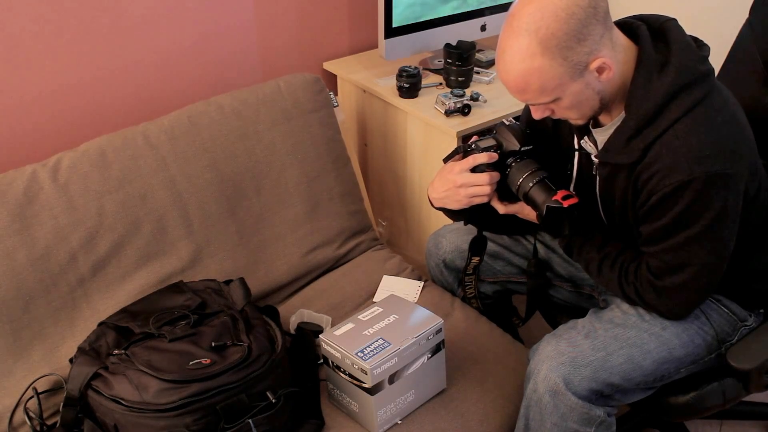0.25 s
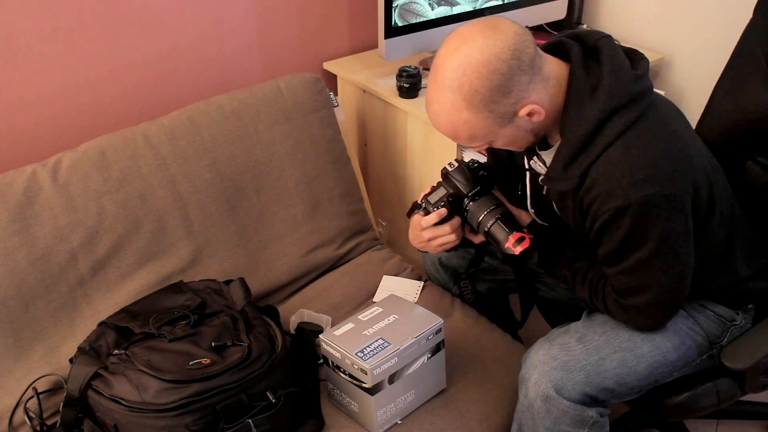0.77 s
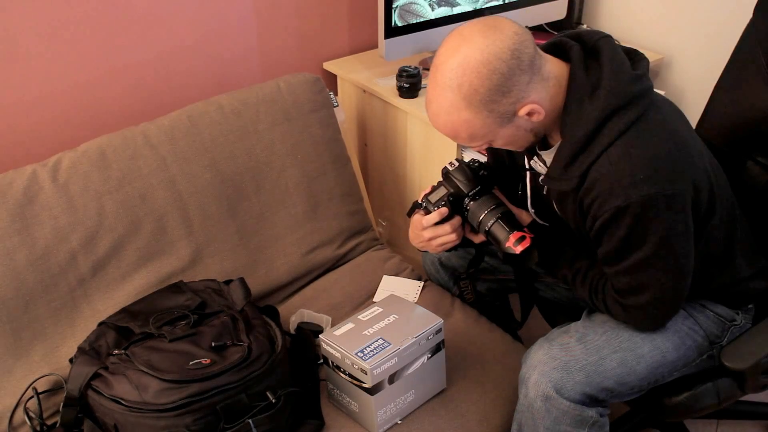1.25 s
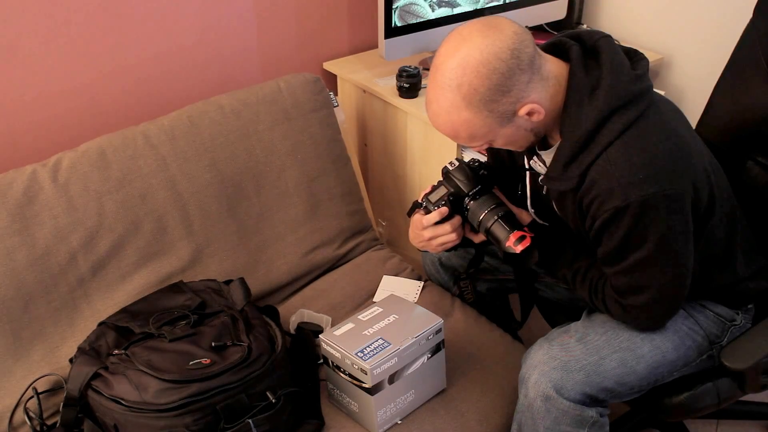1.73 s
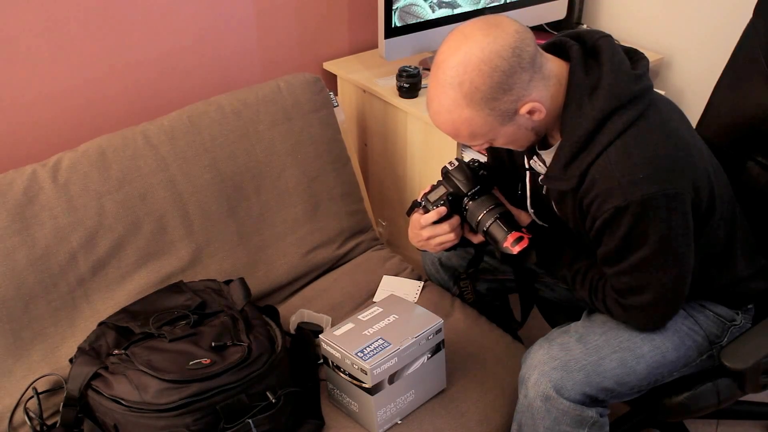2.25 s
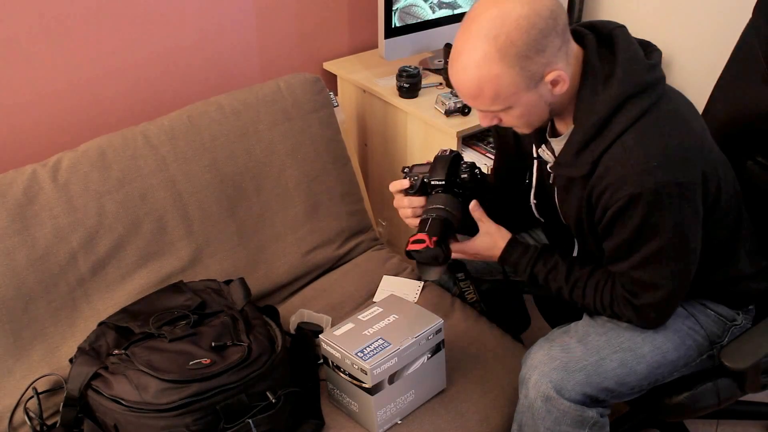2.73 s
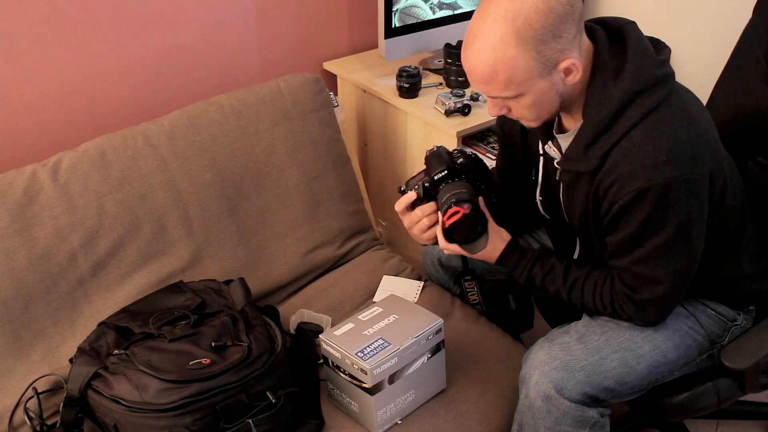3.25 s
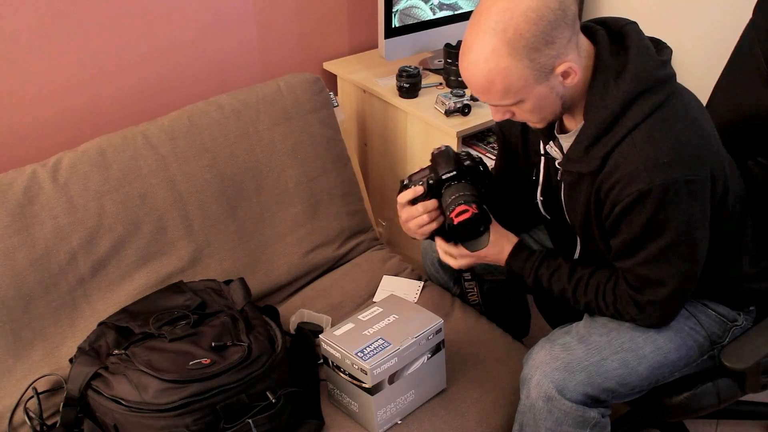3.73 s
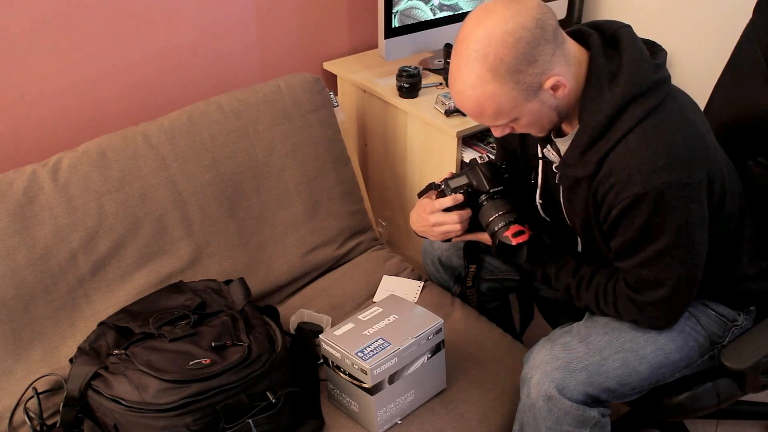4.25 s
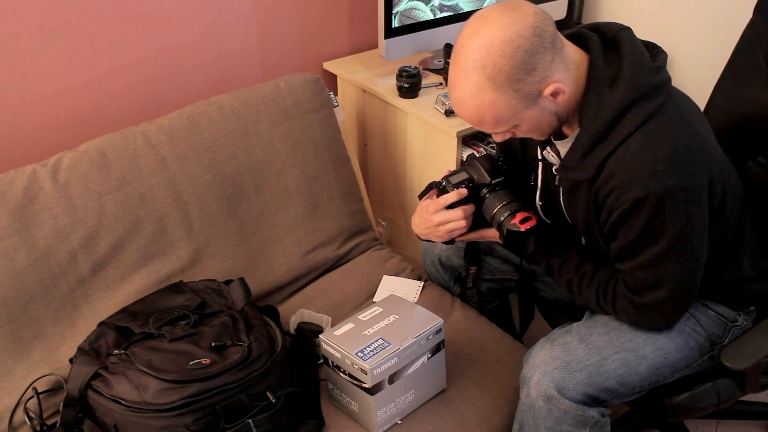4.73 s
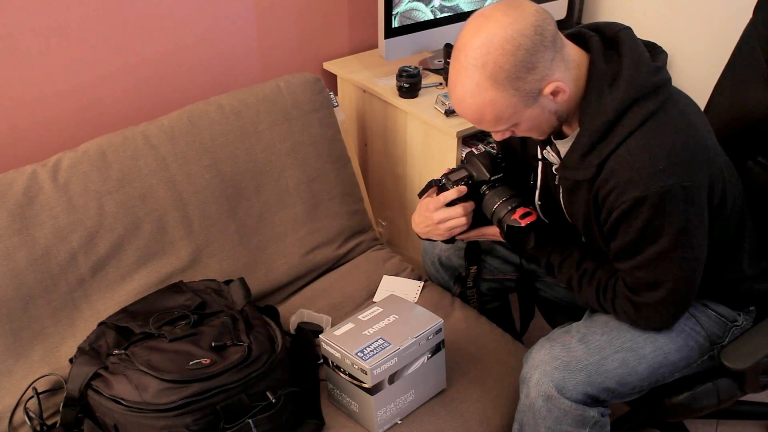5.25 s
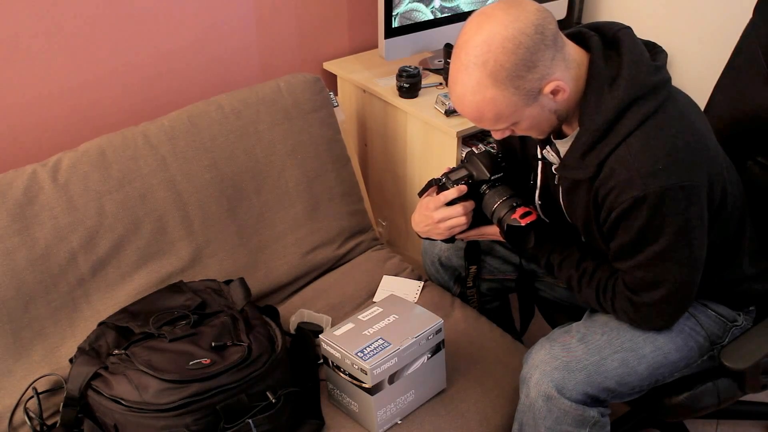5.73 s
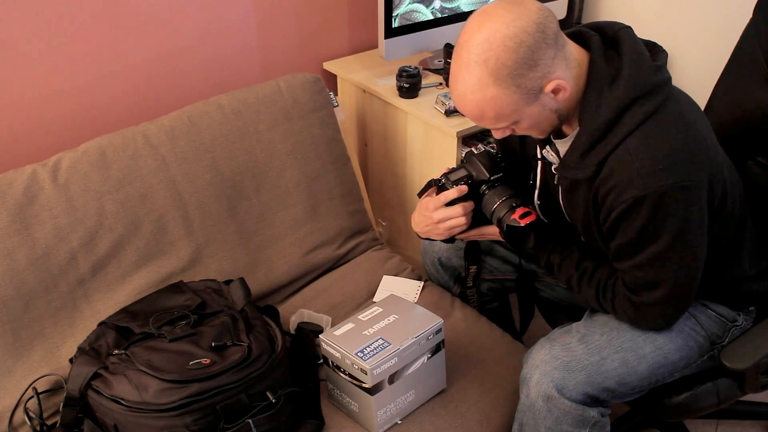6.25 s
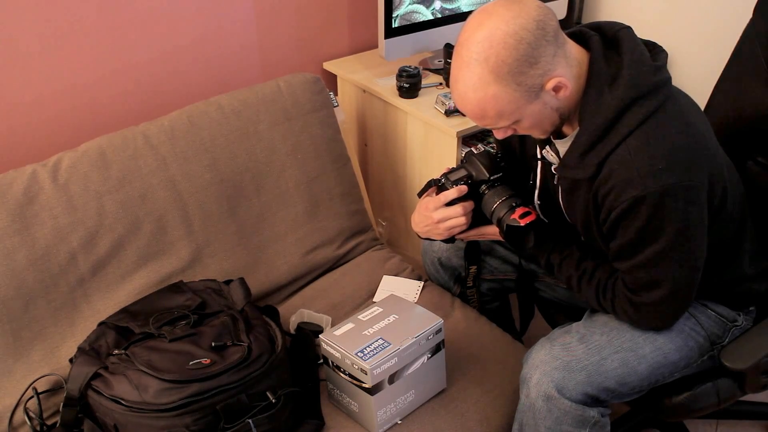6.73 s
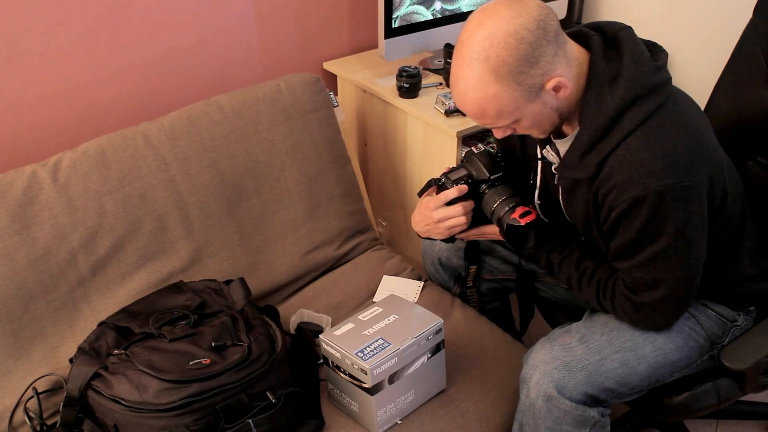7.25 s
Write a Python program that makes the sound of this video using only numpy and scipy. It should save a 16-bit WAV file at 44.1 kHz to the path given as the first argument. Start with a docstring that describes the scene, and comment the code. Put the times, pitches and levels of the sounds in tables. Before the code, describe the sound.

A camera lens autofocus motor whirs, grinds and clacks in short bursts, with fingers tapping and clicking between, in a quiet room.

```python
"""A camera's autofocus hunts in five short bursts, close to a mono microphone in a quiet room.
Plastic gears grind and whine, the lens knocks on its end stop, the motor creeps and latches with a click.
Between bursts, hands slide over the barrel, tap it, press its buttons and snap a sprung switch.
Underneath, a slow machine hums and a low tone swells twice over faint rumble and hiss."""
import sys
import numpy as np
from scipy import signal
from scipy.fft import rfft, irfft
from scipy.io import wavfile
from scipy.ndimage import uniform_filter1d

SR = 44100
rng = np.random.default_rng(int(sys.argv[2]) if len(sys.argv) > 2 else 0)


def wav_out(sig):
    """Save sig, one row per channel (or a flat mono array), as 16-bit PCM at SR to the path in sys.argv[1]."""
    wavfile.write(sys.argv[1], SR, np.round(np.clip(np.atleast_2d(sig).T, -1, 1) * 32767).astype(np.int16))


N = 329868
BINS = np.fft.rfftfreq(2048, 1 / SR)  # frequency grid of every EQ curve [Hz]


# barrel tone with the gears running free, and under load: (frequency [Hz], gain [dB])
FREE_EQ = [(100, -26), (250, 0), (460, 10), (750, 0), (1120, -4), (1350, -8), (2100, -2.5), (2800, -7.5),
           (3650, 1.5), (5000, -10), (5550, -4), (6600, -18.5), (8350, -14), (9400, -21), (15000, -26)]
LOADED_EQ = [(100, -10.5), (250, -4.5), (600, 2), (900, -5.5), (1150, -4.5), (1800, -10.5), (2600, -5),
             (3100, -2), (3600, 1), (4300, -7.5), (5200, -5.5), (7200, -14), (9600, -19.5), (15000, -31.5)]
# small metal parts that ring along under load: (pitch [Hz], level [dB], t60 [s])
SPRING_MODES = [(590, -7, .03), (1535, -6, .18), (3080, 3, .075), (3440, -7, .05), (5170, 3, .09),
                (6145, -2, .14)]
# focus bursts: (start [s], end [s], attack [s], level [dB], swell [dB/s], treble [dB],
# shaft speed [turns/s], wobble [0-1], load [0 free, about 1 grinding])
FOCUS_RUNS = [(0.0, 0.072, 0.00072, -44.5, 36, -10.5, 79.9, 0.83, 0.137),
              (1.292, 1.563, 0.031, -46, 25, -12.5, 79.2, 0.59, 0.14),
              (1.745, 2.016, 0.0032, -44.5, -7, -10.5, 79.37, 0.9, 0.17),
              (5.154, 5.357, 0.034, -40.0, 52, -11, 74.33, 0.52, 1.04),
              (7.163, 7.371, 0.045, -38, -28, -9.5, 44.3, 0.62, 1.02)]

def gears(start, end, attack_s, level_db, swell_db_per_s, treble_db, shaft_hz, wobble, load,
          teeth=15, uneven_db=6.5, rub=1.68, coast_s=.011):
    """Uneven teeth strike and rub, harder twice a turn, and sound through the barrel."""
    t = np.arange(start, end + coast_s, 1 / SR)
    turns = np.cumsum(shaft_hz * (1 + .02 * drift(t, 60))) / SR
    strikes = np.diff(np.floor(turns * teeth + .2 * drift(t, 900)), prepend=0) > 0
    strikes = strikes * amp(uneven_db * np.clip(rng.standard_normal(len(t)), -2, 2))
    strikes = signal.fftconvolve(strikes - strikes.mean(), rattle(.00064, blow=1.9))[:len(t)]
    pressure = np.exp(wobble * (.28 * np.cos(2 * np.pi * turns) + .33 * np.cos(4 * np.pi * turns)))
    force = (unit(strikes) + rub * rng.standard_normal(len(t))) * pressure * amp(drift(t, 90))
    springs = load * amp(-46) * signal.fftconvolve(force, ring(SPRING_MODES))[:len(t)]
    barrel = (1 - load) * curve(FREE_EQ) + load * curve(LOADED_EQ) + curve([(1100, .5), (2000, 0)])
    grind = unit(colour(force + springs, barrel))
    treble = signal.fftconvolve(grind, signal.firwin(63, 6000, pass_zero=False, fs=SR), "same")
    effort_db = swell_db_per_s * (t - t.mean())
    body = amp(effort_db - 1.5) * (grind - treble)
    # the top end swells less than the body but pulses harder with the shaft
    sizzle = amp(treble_db + .63 * effort_db) * unit(treble * pressure ** .61)
    return start, amp(level_db) * (body + sizzle) * envelope(t, attack_s, .0054) ** 2


# tones of the fast gears at full speed: (pitch [Hz], level [dB])
MESH_TONES = [(3724, 0), (3328, -8), (3850, -14)]
# how well the whine gets out of the lens: (frequency [Hz], gain [dB])
HOUSING_EQ = [(3000, -16), (3300, 4), (3900, 1.5)]
# free-running gears sing: (start [s], end [s], fast gears [dB], their swell [dB/s], slow gear [dB])
GEAR_WHINES = [(1.319, 1.557, -50, 5, -56), (1.756, 2.007, -55.5, -33, -56.5)]

def whine(start, end, fast_db, swell_db_per_s, slow_db, slow_hz=1110, sag=.125, sag_s=.021, flutter_db=2):
    """Gear tones dip as the motor takes up the lens, then glide back up to full speed."""
    t = np.arange(0, end - start, 1 / SR)
    speed = 1 - sag * (t / sag_s * np.exp(1 - t / sag_s)) ** 2
    angle = 2 * np.pi * np.cumsum(speed * (1 + .0021 * drift(t, 120))) / SR
    fast = sum(amp(db + curve(HOUSING_EQ, hz * speed) + flutter_db * drift(t, 160)) * np.sin(hz * angle)
               for hz, db in MESH_TONES)
    build_up = 1 - np.exp(-t / .06)
    slow = amp(flutter_db * drift(t, 140)) * build_up * np.sin(slow_hz * angle)
    tones = amp(fast_db + swell_db_per_s * t) * speed ** 2 * fast + amp(slow_db) * slow
    return start, np.sqrt(2) * tones * envelope(t, .008, .004)


# end-stop clacks: (time [s], level [dB], thud [dB], snap [dB], chatter [s], resonance [Hz])
END_STOPS = [(0.081, -16, -15.5, -12, 0.0033, 780), (1.567, -11.5, -24.5, -19.5, 0.0022, 3800),
             (2.019, -13, -16, -8, 0.003, 450), (5.364, -12.5, -22.5, -17.5, 0.0023, 3200)]

def end_stop(s, db, thud_db, snap_db, chatter_s, hz):
    """The lens group clacks against its hollow housing."""
    tilt = curve([(600, thud_db + 23), (1400, 0), (4500, 0), (7500, snap_db + 15)])
    force = rattle(chatter_s, blow=5.1, rise_s=.00095)
    return knock(s, db, tilt + bell(hz, db=6, octaves=.3), force, crest_db=25)


# tone of the creeping motor: (frequency [Hz], gain [dB])
CREEP_EQ = [(200, -19), (400, -4.5), (540, -9), (800, -15), (1300, -10), (2200, -22.5), (4400, -19.5),
            (5700, -21.5), (7100, -22), (8200, -30.5), (15000, -44)]
# the motor inches along: (start [s], end [s], level [dB])
MOTOR_CREEPS = [(0.091, .144, -55.5), (1.578, 1.627, -56.5), (2.031, 2.083, -55), (5.375, 5.422, -55),
                (6.963, 7.035, -55)]

def creep(start, end, db, tooth_hz=543, uneven_db=3, rub=1.3):
    """A soft rough buzz of teeth at low speed, growing as they take up the slack."""
    t = np.arange(start, end, 1 / SR)
    angle = 2 * np.pi * np.cumsum(tooth_hz * (1 + .006 * drift(t, 148.5))) / SR
    overtones = sum(amp(uneven_db * rng.standard_normal()) * np.cos(k * angle + 2 * np.pi * rng.random())
                    for k in range(2, 14))
    force = unit(np.cos(angle) + .397 * overtones) + rub * rng.standard_normal(len(t))
    level = amp(db + np.linspace(-3, 1.5, len(t))) * envelope(t, .0028, .0028)
    return start, level * unit(colour(force, curve(CREEP_EQ)))


# the gears take up their slack: (time [s], level [dB], snap [dB], chatter [s])
SLACK_KICKS = [(1.292, -43.5, -18.5, 0.0054), (1.325, -33.5, -16, 0.0042), (1.742, -31, 12, 0.0019),
               (5.149, -39.5, -15, 0.012), (6.935, -31, -21, 0.0068), (6.947, -33, -14, 0.0047),
               (7.147, -44, -13, .005), (7.165, -27.5, 5, 0.007), (7.172, -22, -14, 0.0037)]
# the drive latches after a creep: (time [s], level [dB])
DRIVE_LATCHES = [(1.648, -27), (5.438, -30), (7.049, -33)]

def drive_clicks(halt_db=-41.5):
    """The drive kicks as its gears engage, ticks as each creep halts, and latches."""
    kicks = [click(s, db, -9.5, snap_db, chatter_s, hz=3330) for s, db, snap_db, chatter_s in SLACK_KICKS]
    halts = [(end, halt_db) for _, end, _ in MOTOR_CREEPS]
    return kicks + [click(s, db, thud_db=-17, snap_db=-19, chatter_s=.0017, hz=3370, resonance_db=0)
                    for s, db in [*halts, *DRIVE_LATCHES]]


# ring of the switch spring: (pitch [Hz], level [dB], t60 [s])
SWITCH_RING = [(484, -26, 0.18), (1555, 3, 0.18), (3030, -7.5, .15), (3900, -4, .15)]

def switch(s, snap_level_db=-14, ring_db=-48.5, buzz_db=-42.5, buzz_t60=.18):
    """A sprung switch snaps over; its spring sings and loose plastic buzzes out."""
    snap = click(s, snap_level_db, thud_db=-15, snap_db=-18.5, chatter_s=.003, hz=1510, resonance_db=7)
    spring = ring(SWITCH_RING)
    t = np.arange(len(spring)) / SR
    plastic = curve(SHELL_EQ) + curve([(2000, -4), (8000, -13.5)])
    buzz = unit(colour(rng.standard_normal(len(t)), plastic))
    return [snap, (s, amp(ring_db) * spring + amp(buzz_db - 60 * t / buzz_t60) * buzz)]


# button presses: (time [s], click level [dB], bottoming-out level [dB])
BUTTON_PRESSES = [(0.247, -32, -41), (2.195, -31.5, -39.5), (3.871, -40, -56)]

def button(s, db, bottom_db, lead_s=.016, travel_s=.0135):
    """The finger lands softly, the button snaps through and bottoms out."""
    return [click(s - lead_s, db - 16.5, thud_db=-25, snap_db=2, chatter_s=.0074, hz=4530),
            click(s, db, thud_db=-14, snap_db=-3, chatter_s=.0024, hz=10000),
            tap(s + travel_s, bottom_db, thud_db=-14.5, chatter_s=.0079)]


# fingers on the body: (time [s], level [dB], thud [dB], chatter [s], resonance [Hz])
FINGER_TAPS = [(2.417, -44.5, 0, .002, 950), (2.549, -44, -13.5, .002, 870), (2.907, -40, -8, 0.0023, 1100),
               (2.922, -41, -5, .002, 804), (2.975, -30.5, -15.5, 0.0057, 1520),
               (2.993, -37, -13, 0.0077, 1240), (3.102, -37.5, -8.5, 0.0036, 1040),
               (3.645, -25.5, -20, 0.0037, 1920), (3.667, -34, -11.5, 0.0031, 950),
               (3.855, -35.5, -8, 0.006, 1340), (3.955, -41, -8, 0.003, 840),
               (4.002, -40.5, -7, .0016, 1000), (4.034, -27.5, -7.5, 0.0036, 1060)]

def tap(s, db, thud_db=-9, chatter_s=.003, hz=950):
    """A fingertip knocks dully on the body."""
    return click(s, db, thud_db, snap_db=-16, chatter_s=chatter_s, hz=hz, resonance_db=9.5)


def fidget(start, end, db, spread_db=2, count=6):
    """Faint taps at random moments while the grip shifts."""
    return [tap(start + when * (end - start), db + spread_db * (2 * size - 1))
            for when, size in rng.random((count, 2))]


# small plastic ticks: (time [s], level [dB])
GRIP_TICKS = [(2.616, -41), (2.868, -50), (4.135, -49), (4.148, -40.5), (6.094, -47.5), (6.24, -54)]

def grip_tick(s, db):
    """The plastic shell ticks under the grip."""
    return click(s, db, thud_db=-16, snap_db=-10.5, chatter_s=.00345, hz=3640)


# bright skin friction and soft sleeve rustle: (frequency [Hz], gain [dB])
SKIN_EQ = [(880, -24), (1500, -8), (2170, -4.5), (3030, -5.5), (3480, -1.5), (5400, -8.5), (7670, -7.5),
           (14500, -20), (15500, -24)]
CLOTH_EQ = [(200, -13), (500, 8), (1000, 6.5), (1800, 3), (3000, -19), (8000, -23)]
# hand moves: (start [s], end [s], skin level [dB], cloth level [dB])
HAND_SLIDES = [(2.149, 2.713, -75, -72), (2.702, 3.01, -78, -72), (2.95, 3.542, -66, -69.5),
               (3.6, 4.296, -78, -78)]

def hand_slide(start, end, skin_db, cloth_db, unsteady_db=1.2):
    """Skin slides on the barrel and sleeves rustle, under an unsteady pressure."""
    t = np.arange(start, end, 1 / SR)
    skin = amp(skin_db) * friction(t, SKIN_EQ)
    cloth = amp(cloth_db) * friction(t, CLOTH_EQ)
    pressure = amp(unsteady_db * drift(t, 13.4))
    return start, (skin + cloth) * pressure * envelope(t, .079, .12)


def swish(middle_s, length_s, db, hz):
    """A dry fingertip brushes the barrel: a short airy band of noise."""
    t = np.arange(0, length_s, 1 / SR)
    band = [(hz / 4, -20), (hz / 2, -9), (hz, 0), (2 * hz, -12)]
    brush = friction(t, band, grain_db=3, grains_per_s=300)
    return middle_s - length_s / 2, amp(db) * brush * np.hanning(len(t))


# partials of the machine hum: (multiple of the turn rate [ratio], level [dB])
HUM_PARTIALS = [(1, -61.5), (2, -74.5), (2.46, -70), (3, -70.5), (4, -63.5), (5, -76), (6, -76.5),
                (7, -72.5), (8, -70), (9, -81), (10, -73.5), (11, -80.5), (12, -72.5), (14, -78), (17, -80),
                (18, -91)]

def machine_hum(turn_hz=20.2, smear_cycles=.21, lag_cycles=2.3):
    """The partials of a slow machine throb once a turn, the low ones lagging behind the high."""
    t = np.arange(N) / SR
    hum = np.zeros(N)
    for k, db in HUM_PARTIALS:
        level = amp(db + drift(t, 4.6))
        phase = 2 * np.pi * (smear_cycles * rng.random() - lag_cycles * np.log(k)) + .15 * drift(t, 3.3)
        hum += level * np.sin(2 * np.pi * k * turn_hz * t + phase)
    return np.sqrt(2) * hum


# swells of the low tone: (start [s], end [s], level [dB])
DRONE_SWELLS = [(2.005, 2.6, -62.5), (2.6, 4.3, -61.5)]

def drone(start, end, db, hz=106, waver_db=2, waver_rad=.71):
    """A low tone swells, wavers and fades."""
    t = np.arange(start, end, 1 / SR)
    level = amp(db + waver_db * drift(t, 5.5)) * envelope(t, .14, .24)
    return start, np.sqrt(2) * level * np.sin(2 * np.pi * hz * t + waver_rad * drift(t, 6.7))


# the noise bed: (frequency [Hz], gain [dB])
ROOM_TONE_EQ = [(20, -18.5), (32, -7), (45, -2.5), (81, -10), (123, -5.5), (237, -11.5), (400, -20.5),
                (800, -26), (1100, -31), (2000, -38.5), (13000, -44), (15500, -49.5)]

def room_tone(hiss_db=-78):
    """Room rumble and microphone hiss, levelled by the part above 2 kHz."""
    noise = colour(rng.standard_normal(N), curve(ROOM_TONE_EQ))
    hiss = signal.sosfilt(signal.butter(2, 2000, "high", fs=SR, output="sos"), noise)
    return amp(hiss_db) * noise / hiss.std()


def reverb(x, wet_db=-22, t60=.35, predelay_s=.004):
    """The faint, dull, short tail of a furnished room."""
    t = np.arange(SR // 3) / SR
    tail = rng.standard_normal(len(t)) * amp(-60 * t / t60) * (t > predelay_s)
    tail = colour(tail / np.linalg.norm(tail), curve([(3000, .011), (12000, -9)]))
    return amp(wet_db) * signal.fftconvolve(x, tail)[:N]


# tone of struck plastic: (frequency [Hz], gain [dB])
SHELL_EQ = [(60, -17.5), (200, -0.5), (450, 3.5), (700, -2), (1000, -2), (1400, -7), (2400, -8.5),
            (3300, -4), (4500, -5), (7000, -6.5), (10000, -15), (15000, -24.5)]

def knock(s, db, eq, force, crest_db, rebound=.25, rebound_s=.001442):
    """A blow and its quick rebound sound through the shell; the pair makes it hollow."""
    force = np.pad(force, (0, len(force)))
    lag = round(rebound_s * rng.uniform(.85, 1.158) * SR)
    sound = colour(force + rebound * np.roll(force, lag), curve(SHELL_EQ) + eq)
    return s - .0012, amp(db - crest_db) * unit(sound)


def click(s, db, thud_db, snap_db, chatter_s, hz, resonance_db=10):
    """A small part clicks with its own resonance; thud shapes the lows, snap the highs."""
    tilt = curve([(800, thud_db + 16), (2000, 0), (4500, 0),
                  (7500, snap_db + 12.5), (13000, snap_db + 15)])
    force = rattle(chatter_s, blow=6.9, rise_s=.00035)
    return knock(s, db, tilt + bell(hz, resonance_db, octaves=.32), force, crest_db=24)


def rattle(chatter_s, blow, rise_s=.00015):
    """A light first touch, the blow, then quickly dying chatter, about equally strong at all pitches."""
    t = np.arange(1024) / SR - .003
    force = rng.standard_normal(len(t)) * np.exp(-np.where(t < 0, -t / rise_s, t / chatter_s))
    force[np.argmin(abs(t))] += blow
    spectrum = rfft(force)
    return irfft(spectrum / np.sqrt(uniform_filter1d(abs(spectrum) ** 2, size=7)))


def ring(modes):
    """Dying modes of a struck metal part."""
    t = np.arange(SR // 3) / SR
    return sum(amp(db - 60 * t / t60) * np.cos(2 * np.pi * hz * t) for hz, db, t60 in modes)


def friction(t, eq_points, grain_db=1.5, grains_per_s=700):
    """Rubbing noise, made grainy by a fast flicker in level."""
    grains = rng.standard_normal(len(t)) * amp(grain_db * drift(t, grains_per_s))
    return unit(colour(grains, curve(eq_points)))


def colour(x, db):
    """Passes x through a causal body whose gain over BINS is db."""
    log_gain = np.log(amp(np.maximum(db, -100)))
    mirrored = np.r_[log_gain, log_gain[-2:0:-1]]
    response = np.fft.ifft(np.exp(np.conj(signal.hilbert(mirrored)))).real
    return signal.fftconvolve(x, response)[:len(x)]


def curve(points, hz=BINS):
    """An EQ curve in dB, joined by straight lines over log frequency."""
    f, db = np.transpose(points)
    return np.interp(np.log(hz + 1), np.log(f + 1), db)


def bell(hz, db, octaves):
    """The EQ bump of one resonance."""
    return db * np.exp(-(np.log2((BINS + 1) / hz) / octaves) ** 2)


def drift(t, per_s):
    """A random wander of size about one."""
    knots = rng.standard_normal(4096)
    return np.interp((t - t[0]) * per_s, np.arange(len(knots)), knots)


def envelope(t, attack_s, release_s):
    """Linear attack, hold and release."""
    return np.clip(np.minimum((t - t[0]) / attack_s, (t[-1] - t) / release_s), 0, 1)


def amp(db):
    return 10 ** (np.asarray(db) / 20)


def unit(x):
    return x / np.sqrt(np.mean(x ** 2) + 1e-20)


def add(mix, s, sound):
    part = mix[max(round(s * SR), 0):][:len(sound)]
    part += sound[:len(part)]


def play(source, cues):
    return [source(*cue) for cue in cues]


def scene():
    """The autofocus and the handling close by, in a quiet humming room."""
    sounds = play(gears, FOCUS_RUNS) + play(whine, GEAR_WHINES) + play(end_stop, END_STOPS)
    sounds += play(creep, MOTOR_CREEPS) + drive_clicks()
    sounds += switch(s=3.457) + [swish(middle_s=2.52, length_s=.2, db=-72, hz=11500)]
    sounds += play(hand_slide, HAND_SLIDES) + play(tap, FINGER_TAPS) + play(grip_tick, GRIP_TICKS)
    sounds += [part for press in BUTTON_PRESSES for part in button(*press)]
    sounds += fidget(start=2.25, end=4.2, db=-50)
    camera = np.zeros(N)
    for s, sound in sounds:
        add(camera, s, sound)
    mix = camera + reverb(camera) + machine_hum() + room_tone()
    for s, sound in play(drone, DRONE_SWELLS):
        add(mix, s, sound)
    return mix * amp([[3], [-4.6]])  # one microphone, louder in the left channel


def record(dry, cutoff_hz=15700):
    """A steep low-pass trims the very top."""
    lowpass = signal.firwin(161, cutoff_hz, window=("kaiser", 9), fs=SR)
    return signal.oaconvolve(dry, lowpass[None], "same", axes=1)


dry = scene()
out = record(dry)
wav_out(out)
```